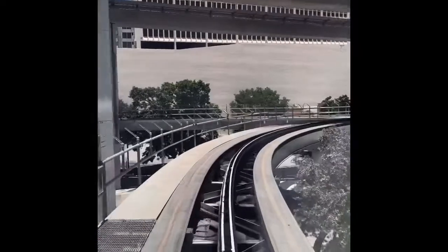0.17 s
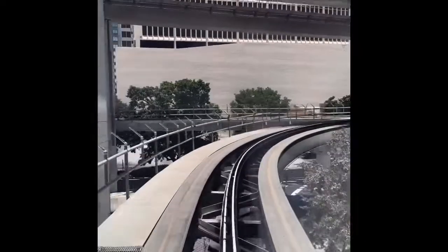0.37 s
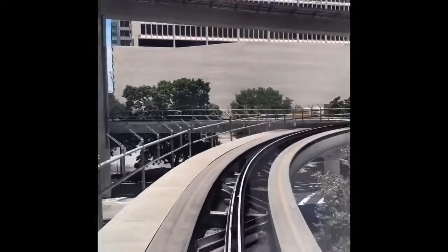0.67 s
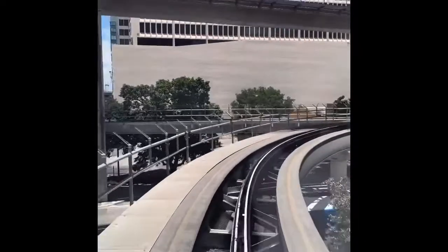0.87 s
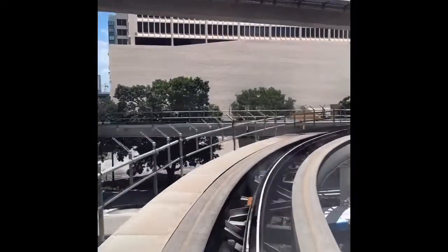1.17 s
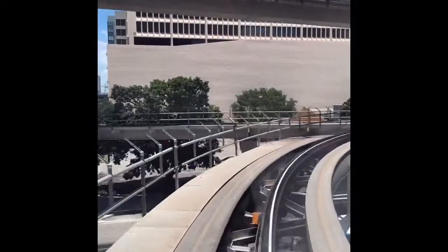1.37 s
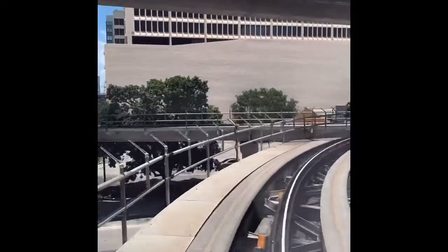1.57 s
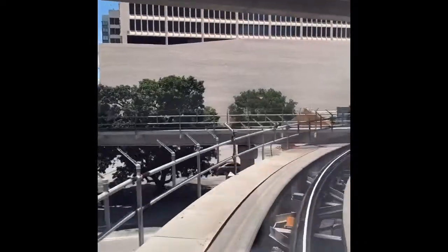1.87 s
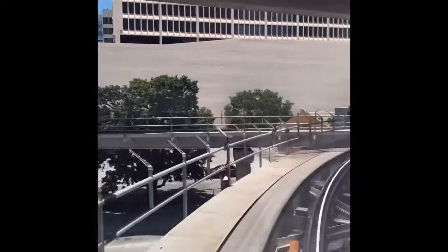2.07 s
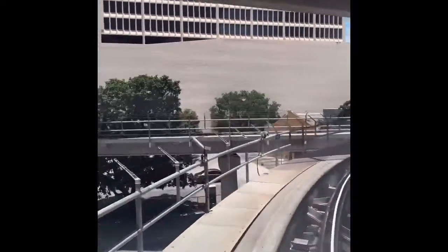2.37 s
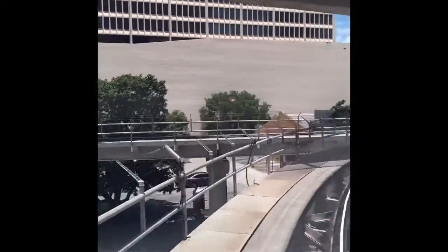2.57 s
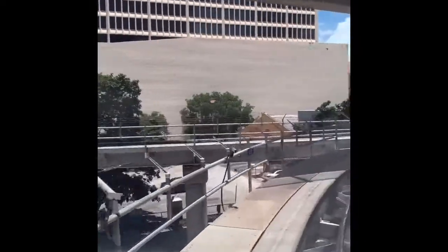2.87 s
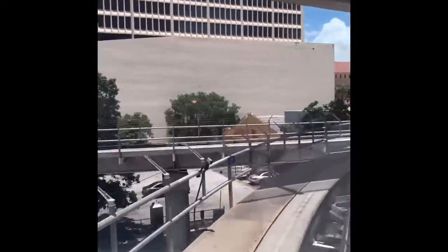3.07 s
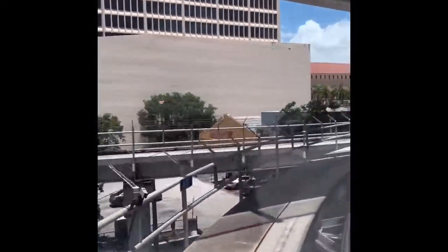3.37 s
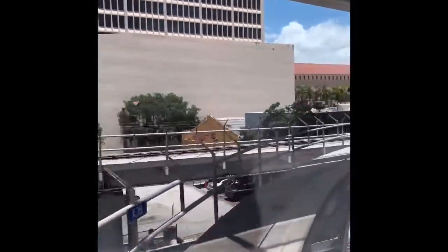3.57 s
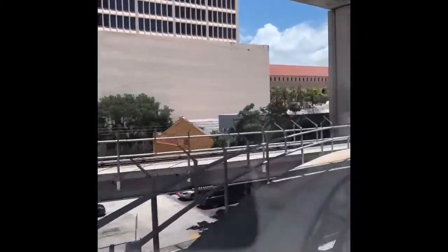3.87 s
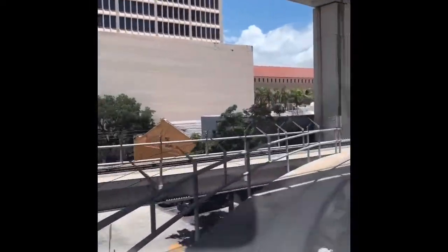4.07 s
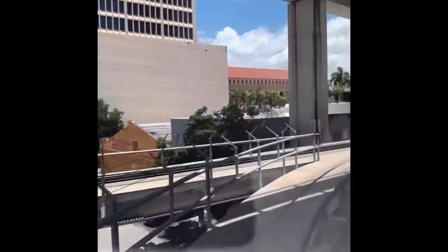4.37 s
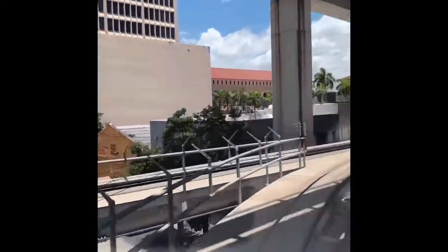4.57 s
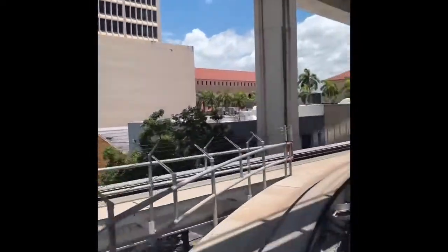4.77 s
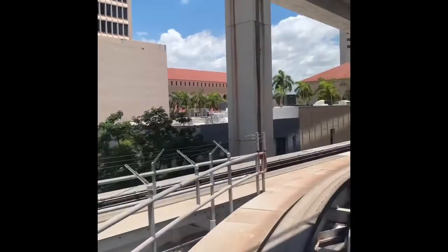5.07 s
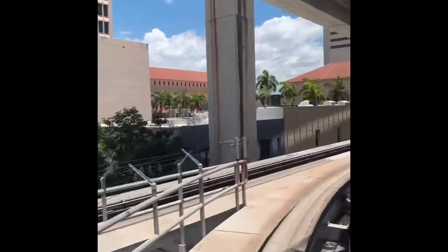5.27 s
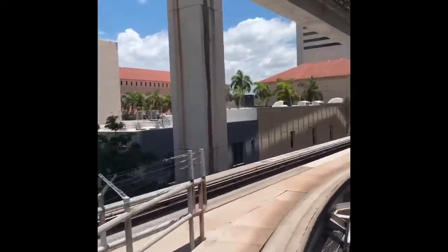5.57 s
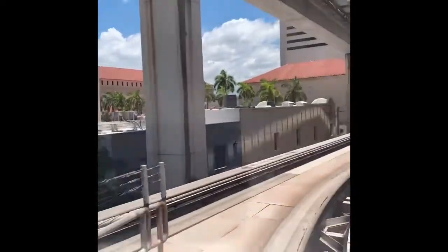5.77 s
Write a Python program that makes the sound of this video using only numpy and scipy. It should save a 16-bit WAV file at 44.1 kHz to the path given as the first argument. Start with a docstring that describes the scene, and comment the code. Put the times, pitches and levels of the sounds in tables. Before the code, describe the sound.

The interior of a rubber-tyred train car gliding round a bend on a concrete guideway. From start to end there is a dense, steady low rumble, boomy around the cabin's resonances, its deepest part slowly heaving, with a muffled mid roar above. A wavering air-conditioner hum near 118 Hz blends in, sagging before 3 seconds and then firming. Over this lies a faint sliding hiss from the power-rail shoes, swelling into brief scrapes at about 0.3, 1.0 and 1.3 seconds. A brighter scrape with a click comes at 2.0, a sharper, louder one at 2.5, and a crisp click at 3.6. Scrapes return at 3.7 and 4.6, then a rapid, bright, crackling cluster at 4.8 to 4.9, with another click at 5.1. A loose fitting knocks at 5.27 and harder at 5.33, bouncing with a tiny hard ring. A last soft scrape comes at 5.5; the rumble continues to the cut. Close stereo, short cabin reflections.

```python
"""Inside a rubber-tyred train car on a concrete guideway: tyre rumble, shaped noise, booms in the cabin modes.
Pickup shoes hiss on the power rail, scrape and click at joints: noise under swells, and short bursts.
A loose fitting knocks as decaying sines; the air conditioner hums in wavering sines.
Two close microphone ports hear the treble at different times."""
import sys
import numpy as np
from scipy import signal
from scipy.fft import rfft, irfft, next_fast_len
from scipy.io import wavfile
from scipy.ndimage import uniform_filter1d

SR = 44100
rng = np.random.default_rng(int(sys.argv[2]) if len(sys.argv) > 2 else 0)


def digitize_waveform(pressure):
    """Quantize a signal to 16-bit integers and store it at the path in sys.argv[1].

    Rows of a 2-D input are taken as channels; values are limited to [-1, 1].
    """
    field = np.atleast_2d(pressure).T
    bounded = np.clip(field, -1, 1)
    quanta = np.round(bounded * 32767).astype(np.int16)
    wavfile.write(sys.argv[1], SR, quanta)


def decibels_to_gain(level_db):
    """Convert a level in decibels to a linear amplitude gain (20 dB per decade)."""
    exponent = np.asarray(level_db, float) / 20
    return 10 ** exponent


N = 261513  # length in samples


def evened(x):
    """Scales to rms 1."""
    return x / np.sqrt(np.mean(x ** 2) + 1e-20)


def wander(span):
    """Slow random drift of rms 1: white noise averaged twice over span samples."""
    drift = uniform_filter1d(rng.standard_normal(N), size=span)
    return evened(uniform_filter1d(drift, size=span))


def read(points, hz):
    """Reads a spectrum on a log-frequency axis."""
    f, value = np.transpose(points)
    return np.interp(np.log(hz + 1), np.log(f + 1), value)


def curve(rows, column):
    """One column of a time table at every sample."""
    rows = np.asarray(rows)
    return np.interp(np.arange(N) / SR, rows[:, 0], rows[:, column])


def resonances(modes, hz):
    """Lift in dB from a set of modes, each a rounded peak of its own width."""
    return sum(db / (1 + (2 * (hz - f) / width) ** 2) for f, width, db in modes)


def noise(field_db, size, patchy_db):
    """Two unrelated noises whose short-time spectra follow field_db(seconds, Hz) with drifting patches."""
    s = (np.arange(N * 4 // size + 5) * size / 4 / SR)[:, None]
    hz = np.fft.rfftfreq(size, 1 / SR)
    a, b, c, d, patches = rng.standard_normal((5, len(s), len(hz)))
    patches = uniform_filter1d(patches, size=8, axis=0)
    patches = evened(uniform_filter1d(patches, size=8, axis=1))
    spectra = np.array([a + 1j * b, c + 1j * d]) * decibels_to_gain(field_db(s, hz) + patchy_db * patches)
    return signal.istft(spectra.transpose(0, 2, 1), nperseg=size, noverlap=size * 3 // 4)[1][:, :N]


# spectra of tyre boom and structure roar: (f/Hz, relative level/dB per Hz)
BOOM_SPECTRUM = [(12, -39), (30, -13.5), (55, -8.5), (100, -2), (125, -5.5), (150, -4.5), (240, -7),
                 (265, -13), (300, -12), (320, -16.5), (345, -16.5), (500, -75)]
ROAR_SPECTRUM = [(150, -31.5), (260, -4.5), (320, -8.5), (420, 0.5), (500, -4.5), (600, -4.5), (700, -9),
                 (800, -14), (900, -16), (1050, -19.5), (1400, -18.5), (2000, -28.5), (3500, -36),
                 (7500, -42.5), (9000, -75.5), (13000, -73.5), (14500, -86)]
# cabin modes that lift the rumble: (f/Hz, width/Hz, level/dB)
CABIN_MODES = [(75, 16, 5.5), (92.8, 8.4, 5), (107.8, 14, 5), (118.8, 14, 8), (130.4, 9.9, 6),
               (152, 20, 4.5), (179, 2.2, 2), (197, 10, 2), (211, 12, 3.5), (233.6, 12, 1.5), (295, 9.2, 3),
               (213.2, 28, 4), (248.4, 12, 7), (284.8, 11, 7), (347.4, 13.8, 11), (397, 29, 4),
               (481, 49, 5.5), (528, 30, 2), (630.3, 22, 8.5), (786, 63, 6.5), (999, 64, 6.5),
               (1200, 54, 2.5)]
# uneven drift of the boom level: (t/s, floor level/dB, body level/dB)
BOOM_DRIFT = [(0, -13.5, -14), (.6, -11.5, -14.5), (1.1, -12.5, -14.5), (1.4, -11, -12.5),
              (1.8, -13.5, -12), (2.3, -12, -13.5), (2.75, -11, -14.5), (3.2, -10.5, -14), (3.8, -13, -14),
              (4.4, -12.5, -13.5), (4.8, -10.5, -13), (5.05, -11.5, -14), (5.4, -8, -14),
              (5.93, -11.5, -12)]


def rumble():
    """Rough concrete shakes tyres and floor; the cabin air lifts its own modes."""
    def boom_db(s, hz):
        return read(BOOM_SPECTRUM, hz) + resonances(CABIN_MODES, hz)

    def roar_db(s, hz):
        surge = evened(uniform_filter1d(rng.standard_normal((len(s), 1)), size=2, axis=0))
        upper = np.clip(np.log2((hz + 1) / 500), 0, 1)  # only the upper roar surges
        return read(ROAR_SPECTRUM, hz) + resonances(CABIN_MODES, hz) + 0.6 * surge * upper

    boom = evened(noise(boom_db, size=8192, patchy_db=1.5))
    low_pass = signal.butter(4, 110, fs=SR, output="sos")  # the floor takes over below 110 Hz
    floor = signal.sosfiltfilt(low_pass, boom)
    body = boom - floor
    boom = floor * decibels_to_gain(curve(BOOM_DRIFT, column=1)) + body * decibels_to_gain(curve(BOOM_DRIFT, column=2))
    roar = evened(noise(roar_db, size=4096, patchy_db=0.5))
    return boom + streaked(roar, ring_db=-13) * decibels_to_gain(-21.5)


# light sliding between scrapes: (t/s, level/dB of the hiss above 7.6 kHz before colouring)
SLIDE = [(0, -64.5), (.8, -65), (2.4, -64.5), (3.3, -64), (5.93, -63.5)]
# scrapes, levelled likewise: (start t/s, peak level/dB, rise/s, brightness/dB per octave)
SCRAPES = [(.305, -56.5, 0.045, 0), (.85, -63.5, 0.045, -3.5), (1.02, -58, 0.028, -0.5),
           (1.19, -64, 0.02, -2.5), (1.28, -59, 0.055, -1.5), (2.02, -52, 0.027, 0.5),
           (2.485, -46.5, 0.0095, 0.5), (2.53, -60, 0.016, 5.5), (2.599, -64, 0.022, 4),
           (2.655, -64, 0.016, -8.5), (2.839, -62, 0.024, 0), (3.05, -65, 0.013, -4.5),
           (3.115, -67.5, 0.011, -6), (3.2, -60, 0.033, -1.5), (3.734, -55.5, 0.011, 0.5),
           (4.19, -71, 0.018, -2), (4.6, -55, 0.024, 0.3), (4.79, -61.5, .012, -5.5),
           (4.82, -46, 0.0073, 1), (4.853, -45.5, .012, 1.5), (4.88, -53.5, 0.0092, 10),
           (4.99, -56.5, 0.016, -5.5), (5.084, -57.5, .01, -2), (5.53, -53.5, 0.013, 0.2),
           (5.745, -72, 0.011, 0)]


def rubbing(s):
    """Level and brightness of light sliding plus every scrape: a smooth rise, a short hold, a steady easing."""
    hold_s, ease_db_per_s, dull_db_per_s = 0.034, 58, 4
    slide_bright_db = -3.5  # per octave
    start, db, rise, bright_db = np.transpose(SCRAPES)
    age = s - start
    swell = np.sin(np.pi / 2 * np.clip(age / rise, 0, 1)) ** 2
    easing = np.maximum(age - rise - hold_s, 0)
    scrapes = (swell * decibels_to_gain(db - ease_db_per_s * easing)) ** 2
    slide = decibels_to_gain(2 * np.interp(s, *np.transpose(SLIDE)))  # doubled dB gives power
    power = scrapes.sum(axis=1, keepdims=True) + slide
    scrape_bright = scrapes * (bright_db - dull_db_per_s * easing)
    bright = scrape_bright.sum(axis=1, keepdims=True) + slide * slide_bright_db
    return 10 * np.log10(power), bright / power


# shoe on the rail: (f/Hz, relative level/dB per Hz)
SHOE_SPECTRUM = [(700, -17), (1400, 0.5), (2800, -1.5), (4500, -6), (7000, -11.5), (10000, -15),
                 (13500, -21.5), (15600, -22.5)]
# resonances of the shoe arm: (f/Hz, width/Hz, level/dB)
ARM_MODES = [(1750, 320, 6.5), (3010, 220, 5.5), (3930, 880, 7.5), (5300, 1200, 5.5)]


def shoes():
    """Sliding hiss that follows the pressure of the shoe and skips a little across its whole band."""
    size = 256  # samples per frame, short enough for quick scrapes
    top_hz = np.fft.rfftfreq(size, 1 / SR)
    top_db = 10 * np.log10(np.sum(decibels_to_gain(2 * read(SHOE_SPECTRUM, top_hz[top_hz > 7600]))))

    def hiss_db(s, hz):
        pressure_db, per_octave_db = rubbing(s)
        skips, lumps = rng.standard_normal((2, len(s), 1))
        chatter_db = 0.77 * skips + 0.47 * evened(uniform_filter1d(lumps, size=8, axis=0))
        bright_db = per_octave_db * np.log2(np.maximum(hz, 500) / 10000)  # tilts about 10 kHz
        colour_db = read(SHOE_SPECTRUM, hz) - top_db + resonances(ARM_MODES, hz)
        return pressure_db + chatter_db + bright_db + colour_db

    flat = noise(lambda s, hz: 0 * hz, size=size, patchy_db=0)
    unit = np.std(flat) / np.sqrt(129)  # rms that one of the 129 bins adds at 0 dB
    return streaked(noise(hiss_db, size=size, patchy_db=1.5), ring_db=-5) / unit


BLOW_T = np.arange(4096) / SR  # seconds since a blow


def crack(t60, bright_db):
    """A blow excites all of the band at once: a decaying puff of coloured noise, peak 1."""
    hz = np.fft.rfftfreq(len(BLOW_T), 1 / SR)
    puff = rng.standard_normal((2, len(BLOW_T))) * decibels_to_gain(-60 * BLOW_T / t60)
    puff *= np.minimum(BLOW_T / 0.00037, 1)  # onset in seconds
    tilt_db = bright_db * np.log2(np.maximum(hz, 2500) / 4000)
    puff = irfft(rfft(puff) * decibels_to_gain(read(SHOE_SPECTRUM, hz) + tilt_db))
    return puff / abs(puff).max()


def placed(blows):
    """Lays (seconds, blow) pairs out in time."""
    out = np.zeros((2, N + len(BLOW_T)))
    for s, blow in blows:
        out[:, round(s * SR):][:, :len(BLOW_T)] += blow
    return out


# clicks of the shoe: (t/s, peak level/dB, brightness/dB per octave)
CLICKS = [(.984, -27, -2.), (1.677, -29, -2.), (2.0255, -21.5, 0.), (2.296, -33, 2.), (2.455, -26, -3.),
          (2.49, -19, -4.), (3.5817, -20.5, -1.), (4.222, -30, -3.), (4.5, -29, -4.), (4.8, -27, -3.),
          (4.823, -26, 4.), (4.858, -20.5, -3.), (4.884, -20, -3.), (5.088, -22.5, 4.)]


def shoe_clicks():
    """The shoe strikes the rail at joints: short cracks, each with its own brightness."""
    return placed((s, decibels_to_gain(db) * crack(t60=0.022, bright_db=bright_db)) for s, db, bright_db in CLICKS)


# modes of the loose fitting: (f/Hz, level/dB, t60/s)
FITTING_MODES = [(1850, -10, .012), (2620, -12, .018), (3150, -9, .013), (3600, -5, .014), (4750, -2, .006),
                 (5400, -12, .006), (6300, -19, .018), (7200, -18, .008), (8400, -13, .005)]
# knocks, the second with two bounces: (t/s, crack peak level/dB, ring level/dB, main mode in ring level/dB)
KNOCKS = [(5.2693, -21, -12, -12), (5.3282, -15.5, -7.5, -3.5), (5.331, -22, -16, 2),
          (5.3355, -28, -26, -3)]


def fitting_knocks():
    """Blows on a loose fitting ring its modes; where each lands sets how much the main mode rings."""
    main_hz, main_t60 = 3960, 0.014  # t60 in seconds
    turn = np.array([[0], [np.pi / 2]])  # the second share is a quarter turn away
    ring = sum(decibels_to_gain(db - 60 * BLOW_T / t60) * np.sin(2 * np.pi * f * BLOW_T + turn)
               for f, db, t60 in FITTING_MODES)
    main = decibels_to_gain(-60 * BLOW_T / main_t60) * np.sin(2 * np.pi * main_hz * BLOW_T + turn)
    build = 1 - np.exp(-BLOW_T / 0.0004)  # the ring builds up after the blow
    blows = []
    for s, crack_db, ring_db, main_db in KNOCKS:
        ringing = decibels_to_gain(ring_db) * build * (ring + decibels_to_gain(main_db) * main)
        blows.append((s, decibels_to_gain(crack_db) * crack(t60=0.008, bright_db=-9) + ringing))
    return placed(blows)


# compressor hum: (t/s, f/Hz of the second shaft order, level/dB)
COMPRESSOR = [(0, 118.7, -21), (1.5, 118, -24), (2.8, 118, -26), (3.3, 118.5, -19), (4.8, 117.2, -19.5),
              (5.93, 118.5, -21.5)]
# partials of the hum: (multiple of the second shaft order, level/dB)
COMPRESSOR_ORDERS = [(.5, -9), (1, 0), (1.515, -2)]
# fan blade tones: (f/Hz, level/dB, half of left over right level/dB)
BLADES = [(172, -31, 1.2), (345.5, -37, 2.5)]


def air_conditioner():
    """Wandering, heaving compressor partials and two wavering fan blade tones, a little stronger on the left."""
    wander_hz, heave_db = 2.5, 2  # rms
    turns = np.cumsum(curve(COMPRESSOR, column=1) + wander_hz * wander(9000)) / SR
    level = np.sqrt(2) * decibels_to_gain(curve(COMPRESSOR, column=2) + heave_db * wander(5000))
    hum = level * sum(decibels_to_gain(db) * np.sin(2 * np.pi * (multiple * turns + rng.random()))
                      for multiple, db in COMPRESSOR_ORDERS)
    out = np.array([hum, hum]) * decibels_to_gain([[0.45], [-0.45]])  # the same waveform at both ports
    for hz, db, lean_db in BLADES:
        blade_turns = np.cumsum(hz * (1 + 0.00611 * wander(9000))) / SR
        tone = np.sin(2 * np.pi * (blade_turns + rng.random()))
        out += np.sqrt(2) * tone * decibels_to_gain(db + np.array([[lean_db], [-lean_db]]))
    return out


def streaked(pair, ring_db):
    """Adds a short dense random ring that gives the noise narrow, shifting streaks."""
    hop = round(0.15 * SR)  # a new random ring every 0.15 s, crossfaded, so that no one colour stays
    age = np.arange(SR // 8) / SR
    padded = np.pad(pair, ((0, 0), (hop, 2 * hop)))
    fade = np.sin(np.pi * np.arange(2 * hop) / (2 * hop))
    out = np.zeros((2, N + 3 * hop + len(age)))
    for at in range(0, N + hop, hop):
        ring = rng.standard_normal(len(age)) * decibels_to_gain(-60 * age / 0.053)  # t60 in seconds
        ring *= decibels_to_gain(ring_db) / np.linalg.norm(ring)
        piece = padded[:, at:at + 2 * hop] * fade
        out[:, at:at + 2 * hop + len(age) - 1] += signal.fftconvolve(piece, ring[None], axes=1)
    return (pair + out[:, hop:hop + N]) / np.sqrt(1 + decibels_to_gain(2 * ring_db))


def cabin_answer(blows):
    """The hard-walled cabin answers each blow with a short diffuse tail."""
    age = np.arange(SR // 2) / SR
    tail = rng.standard_normal((2, len(age))) * decibels_to_gain(-60 * age / 0.15)  # t60 in seconds
    tail *= np.clip(age / 0.0087, 0, 1)
    tail /= np.linalg.norm(tail[0])
    return blows[:, :N] + decibels_to_gain(-13.5) * signal.fftconvolve(blows, tail, axes=1)[:, :N]


# likeness of the two ports: (f/Hz, share in common 0..1)
LIKENESS = [(100, .999), (200, .98), (300, .93), (450, .7), (650, .62), (850, .3), (1600, .55), (2600, .45),
            (3500, .75), (4400, .996), (6000, .997), (16000, .998)]
# phase by which the left port leads: (f/Hz, phase/rad)
LEFT_LEAD = [(0, 0), (600, -.3), (1000, .1), (2000, .7), (3500, 1.6), (4750, 3.1), (6900, 6.28),
             (15250, 18.85), (22050, 29.1)]
# left over right: (f/Hz, level/dB)
LEFT_LEAN = [(60, .5), (120, 1), (300, 1.8), (500, -.3), (1000, -.8), (1800, -1.8), (2800, .2), (4200, .4),
             (15000, 0)]


def ports(pair):
    """The right port hears part of what the left hears, later in the treble, plus its own share."""
    margin = 2048  # mirrored samples ahead of the start
    size = next_fast_len(N + 2 * margin)
    hz = np.fft.rfftfreq(size, 1 / SR)
    left, other = rfft(np.pad(pair, ((0, 0), (margin, size - N - margin)), "reflect"))
    same = read(LIKENESS, hz)
    lag = np.exp(-1j * np.interp(hz, *np.transpose(LEFT_LEAD)))
    right = (same * left + np.sqrt(1 - same ** 2) * other) * lag
    lean = decibels_to_gain(read(LEFT_LEAN, hz) / 2)
    return irfft(np.array([left * lean, right / lean]), size)[:, margin:][:, :N]


def scene():
    """Everything in the cabin at the two ports."""
    blows = cabin_answer(shoe_clicks() + fitting_knocks())
    return ports(rumble() + shoes() + blows) + air_conditioner()


def top_cut(x):
    """Nothing passes above the cut-off."""
    return signal.sosfilt(signal.butter(12, 16590, fs=SR, output="sos"), x)


def record(dry):
    """The input rounds off the highest peaks; then a band limit and short fades at both ends."""
    soft = 1.563 * np.tanh(dry / 1.742)
    band_limit = signal.firwin(401, 15750, window=("kaiser", 9), fs=SR)  # low-pass edge in Hz
    limited = signal.oaconvolve(soft, band_limit[None], "same")
    fades = np.clip(np.minimum(np.arange(N) / 40, np.arange(N)[::-1] / 400), 0, 1)
    return top_cut(limited * fades)


dry = scene()
out = record(dry)
digitize_waveform(out)
```